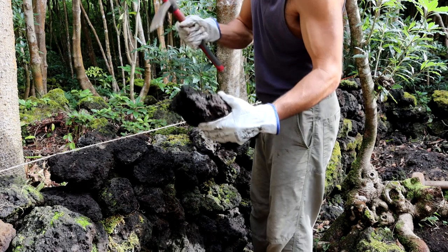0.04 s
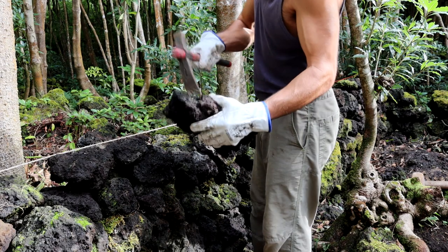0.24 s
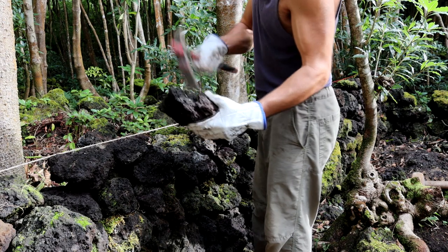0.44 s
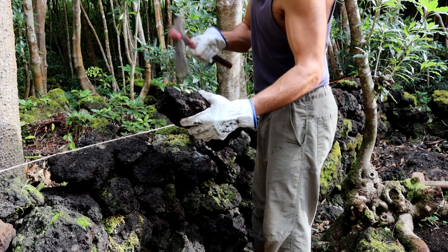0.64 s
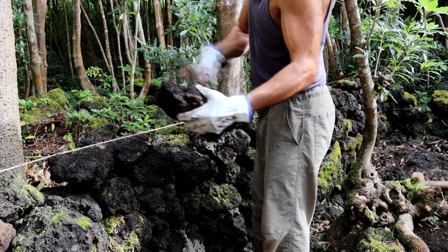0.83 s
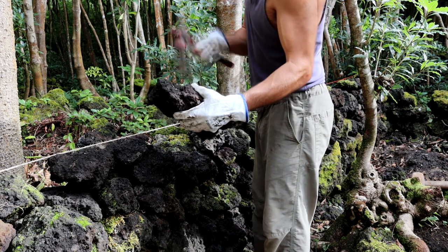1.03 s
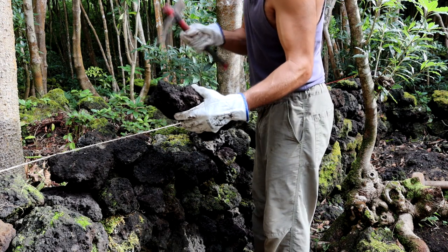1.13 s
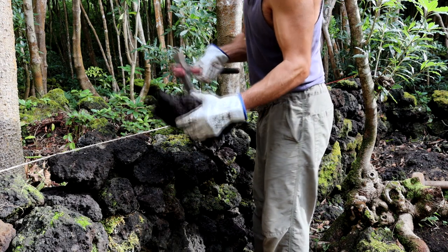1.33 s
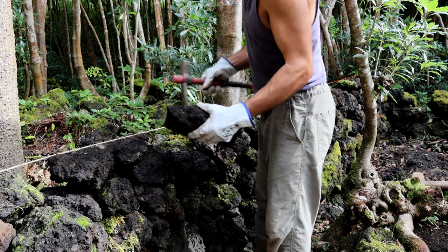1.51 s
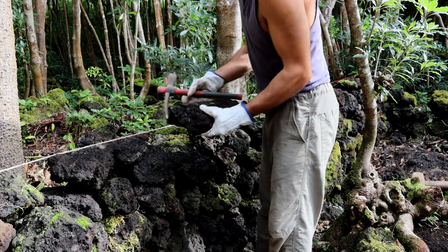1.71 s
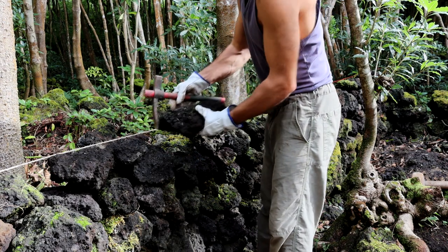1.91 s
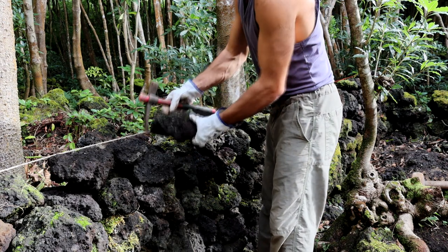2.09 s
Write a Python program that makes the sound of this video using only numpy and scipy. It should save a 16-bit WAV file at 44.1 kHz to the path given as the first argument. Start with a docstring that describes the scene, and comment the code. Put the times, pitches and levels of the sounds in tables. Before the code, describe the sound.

A steel hammer chips a hand-held rock close by, striking at about 0.2, 0.5, 0.9 and 1.3 seconds, with a lighter tap at 1.0. Each blow crunches, knocks and rings briefly, and small chips click between them. From 1.8 seconds the head touches the rock and scrapes grittily. Behind are a low woodland hush, soft clothing rustle and a faint high bird whistle from 0.7 to 1.7 seconds.

```python
"""Hammer chipping rock in a wood

A steel hammer chips a porous rock held in a gloved hand: each blow crushes grit, knocks the rock and
rings the hammer head. Chips click and fall; then the head is laid on the rock and scrapes over it.
Behind are a low outdoor hush, clothing rustle, tiny ticks and a faint high whistle, probably a bird."""
import sys
import numpy as np
from scipy import signal
from scipy.fft import rfft, irfft, next_fast_len
from scipy.io import wavfile
from scipy.ndimage import map_coordinates

SR = 44100
rng = np.random.default_rng(int(sys.argv[2]) if len(sys.argv) > 2 else 0)


def to_wav(sig):
    """Store sig (one row per channel, or 1-D mono) as 16-bit WAV at the path in sys.argv[1].

    Samples outside -1..1 are clipped; the rate is SR.
    """
    pcm = np.clip(np.atleast_2d(sig), -1, 1) * 32767
    pcm = np.round(pcm).astype(np.int16)
    wavfile.write(sys.argv[1], SR, pcm.T)  # frames by channels


N = 94815


def amp(db):
    """Decibels to gain."""
    return 10 ** (np.asarray(db) / 20)


def unit(x):
    """Scale to rms 1."""
    return x / np.sqrt(np.mean(x ** 2) + 1e-20)


def along(points, hz):
    """Read a curve of (f/Hz, value) points on a log frequency axis."""
    freqs, values = np.transpose(points)
    return np.interp(np.log(hz + 1), np.log(freqs + 1), values)


def curves(rows):
    """Automation: one value per sample for each column after the time."""
    times, *columns = np.transpose(rows)
    return [np.interp(np.arange(N) / SR, times, column) for column in columns]


def wobble(rate):
    """A smooth random curve with `rate` knots a second."""
    return map_coordinates(rng.standard_normal(N // 10), [np.arange(N) * rate / SR], mode="wrap")


def filtered(x, response):
    """Apply a gain given as a function of frequency in Hz."""
    n = x.shape[-1]
    padded = next_fast_len(n + SR // 10)
    return irfft(rfft(x, padded) * response(np.fft.rfftfreq(padded, 1 / SR)), padded)[..., :n]


def add(out, start, sound):
    """Mix a sound in at `start` seconds."""
    part = out[:, round(start * SR):][:, :sound.shape[-1]]
    part += sound[..., :part.shape[-1]]


def envelope(t, rise, hold, t60):
    """Attack, hold, then exponential decay; times in seconds."""
    return (1 - np.exp(-t / rise)) * amp(-60 * np.maximum(t - hold, 0) / t60)


def burst(t, colour_db, side_db):
    """Coloured noise of rms 1 with a narrow stereo image."""
    mid, side = filtered(rng.standard_normal((2, len(t))), lambda hz: amp(colour_db(hz)))
    return unit(np.array([mid + amp(side_db) * side, mid - amp(side_db) * side]))


def ring(t, modes, rise, scatter_db):
    """Damped modes, struck a little differently each time and roughened by grit in the contact."""
    draws = rng.standard_normal((len(modes), 3))  # left level, right level, phase
    walks = np.cumsum(rng.standard_normal((len(modes), len(t))), axis=1)
    drifts = 0.35 * walks / np.sqrt(SR * 0.01)  # phase wanders about 0.35 rad in 10 ms
    out = np.zeros((2, len(t)))
    for (hz, db, t60), draw, drift in zip(modes, draws, drifts):
        gain = amp(db + scatter_db * draw[:2, None])
        out += gain * np.sin(2 * np.pi * (hz * t + draw[2]) + drift) * envelope(t, rise, 0, t60)
    return out


def grains(per_s, spread_db):
    """Random impulses; a positive spread makes a few louder, a negative one a few softer."""
    impulses = (rng.random(N) < per_s / SR) * rng.choice([-1, 1], N)
    return impulses * amp(spread_db * np.minimum(rng.exponential(size=N), 2 * np.pi))


def hush():
    """Outdoor bed: a centred low murmur that swells with clothing rustle, and a wide leaf hiss."""
    # murmur spectrum: f/Hz, level/dB
    murmur_colour = [(20, -28), (45, -21), (70, -9.5), (88, -3), (115, -7), (200, -5.5), (330, 0),
                     (520, -3), (750, -7), (1500, -16.5), (3000, -27), (16000, -37)]
    # stereo likeness of the murmur: f/Hz, left-right correlation
    likeness = [(100, 0.93), (350, 0.94), (900, 0.43), (2000, 0.05), (12000, 0.3)]
    # swells of low clothing rustle as the worker moves, over the outdoor hush: t/s, level/dB
    rustle = [(0, -52), (.5, -49.5), (.75, -50.5), (1.0, -53), (1.17, -49), (1.42, -52), (1.57, -47),
              (1.68, -52), (1.81, -46), (2.0, -50.5), (2.12, -48)]
    # leaf spectrum: f/Hz, level/dB
    leaf_colour = [(300, -22), (1500, 2.5), (3000, -1.5), (4300, 4.5), (5500, 1), (7000, 0.5),
                   (10000, -5.5), (16000, -5)]

    def mid_side_gains(hz):
        angle = np.arccos(np.clip(along(likeness, hz), -1, 1)) / 2
        return amp(along(murmur_colour, hz)) * [np.cos(angle), np.sin(angle)]

    mid, side = filtered(rng.standard_normal((2, N)), mid_side_gains)
    murmur = unit(np.array([mid + side, mid - side]))
    leaves = unit(filtered(rng.standard_normal((2, N)), lambda hz: amp(along(leaf_colour, hz))))
    murmur_db, = curves(rustle)
    return amp(murmur_db) * murmur + amp(-54) * leaves


def wood(x):
    """Woodland reverb: quick scatter from ground and wall, then a thin tail from the trees."""
    # decay of the tail: f/Hz, t60/s
    decay = [(150, 0.14), (600, 0.34), (2000, 0.38), (4500, 0.33), (9000, 0.38), (15000, 0.59)]
    # spectrum of the tail: f/Hz, level/dB
    colour = [(200, -17), (1000, 2.5), (3200, 0), (4300, 9), (5400, -0.5), (7500, 1), (14000, -12.5)]
    band_hz, frame_s, bands = signal.stft(rng.standard_normal((2, SR // 2)), SR, nperseg=256)
    fade = amp(-60 * frame_s / along(decay, band_hz)[:, None])
    _, tail = signal.istft(bands * fade, SR, nperseg=256)
    tail = filtered(tail, lambda hz: amp(along(colour, hz)))
    t = np.arange(tail.shape[1]) / SR
    early = rng.standard_normal(tail.shape) * envelope(t, rise=0.008, hold=0.01, t60=0.076)
    response = amp(-19.5) * tail / np.linalg.norm(tail[0]) + amp(-17) * early / np.linalg.norm(early[0])
    return signal.fftconvolve(x, response, axes=1)[:, :N]


def whistle():
    """A faint gliding tone that arrives by many paths, so it flutters and blurs."""
    # whistled phrase: t/s, f/Hz, level/dB
    phrase = [(.69, 6200, -58), (.73, 5900, -52), (.79, 7000, -51), (.85, 6900, -56), (.95, 6500, -68),
              (1.06, 6300, -54), (1.16, 6170, -51), (1.235, 6480, -50), (1.32, 5950, -50),
              (1.42, 6700, -59), (1.52, 7450, -55), (1.585, 6900, -48), (1.60, 6300, -51),
              (1.64, 5950, -54), (1.68, 5700, -72)]
    hz, db = curves(phrase)
    t = np.arange(N) / SR
    phase = 2 * np.pi * np.cumsum(hz * (1 + 0.007 * wobble(500))) / SR
    gate = (t > phrase[0][0]) * (t < phrase[-1][0])
    tone = amp(db + 2 * wobble(25)) * np.sin(phase) * gate
    paths = rng.standard_normal((2, SR // 10)) * envelope(t[:SR // 10], rise=0.001, hold=0, t60=0.015)
    return signal.fftconvolve(tone[None], paths / np.linalg.norm(paths[0]), axes=1)[:, :N]


def ticks():
    """Tiny sparse ticks of falling grit."""
    # tick spectrum: f/Hz, level/dB
    colour = [(500, -20), (3000, -2), (6000, 0), (12000, -2), (16000, -7)]
    clicks = filtered(grains(per_s=40, spread_db=1.5), lambda hz: amp(along(colour, hz)))
    t = np.arange(SR // 50) / SR
    body = rng.standard_normal((2, len(t))) * envelope(t, rise=0.0001, hold=0, t60=0.008)
    return amp(-61) * unit(signal.fftconvolve(clicks[None], body, axes=1)[:, :N])


def scrape():
    """Steel and glove rub over the rock in dense gritty slips."""
    # swell of the strokes: t/s, level/dB
    strokes = [(0, -41.5), (.04, -58), (.7, -51), (1.15, -52.5), (1.45, -53.5), (1.56, -49), (1.615, -42),
               (1.67, -49.5), (1.70, -73), (1.825, -54.5), (1.865, -35), (1.935, -37), (1.952, -39),
               (1.972, -33), (2.015, -49.5), (2.08, -46.5), (2.105, -47.5), (2.15, -39)]
    # grit spectrum: f/Hz, level/dB
    colour = [(100, -20), (250, -8), (600, -4.5), (1400, 3), (2700, 1.5), (5000, -1.5), (8000, -4),
              (12400, -8.5), (16000, -8)]
    level_db, = curves(strokes)
    slips = np.array([unit(grains(per_s=4200, spread_db=-0.5)) for _ in range(3)])  # centre, left, right
    stereo = slips[0] + amp(-7) * slips[1:]
    return amp(level_db) * unit(filtered(stereo, lambda hz: amp(along(colour, hz))))


def chips():
    """Fragments and light touches: each a short click with one resonant peak."""
    # clicks: t/s, level/dB, centre f/Hz, width/octaves, t60/s
    clicks = [(0.306, -38, 13000, 0.63, .015), (0.3747, -42.5, 7200, 2, 0.09),
              (0.4046, -37, 7000, 1.5, .015), (0.4407, -40, 2510, 6, 0.019), (.4638, -42, 7200, 1.2, .015),
              (0.569, -8, 1840, 0.7, 0.017), (0.575, -27.5, 2190, 1.1, 0.067),
              (0.9276, -29.5, 2370, 0.93, 0.038), (0.9344, -31.5, 9200, 2.3, 0.029),
              (0.9363, -33.5, 296, 0.55, 0.031), (1.0358, -45, 12000, 1, .015),
              (1.1149, -35.5, 10200, 1.3, 0.016), (1.1532, -36.5, 3300, 1.8, 0.037),
              (1.3815, -32.5, 880, 1.4, 0.032), (1.3934, -22.5, 6030, 0.17, 0.0089),
              (1.3931, -25, 2250, .5, .018), (1.582, -35.5, 3000, 1.6, 0.022),
              (1.8352, -35, 2310, 3, 0.055), (1.851, -31, 1670, 1.1, 0.023),
              (1.8614, -26, 1300, 3.8, 0.021), (1.9644, -25.5, 4160, 4.4, 0.041),
              (1.9735, -28, 4540, 4.5, 0.027), (2.0487, -33.5, 2780, 2.3, 0.029)]
    out, t = np.zeros((2, N)), np.arange(SR // 6) / SR
    for start, db, centre_hz, width, t60 in clicks:
        def peak_db(hz):
            octaves = np.abs(np.log2((hz + 1) / centre_hz))
            return -10 * np.log10(1 + (2 * octaves / width) ** 2) - 2.2 * octaves

        click = burst(t, peak_db, side_db=-12) * envelope(t, rise=0.000093, hold=0.00043, t60=t60)
        add(out, start, amp(db) * click)
    return out


def knocks():
    """The rock recoils in the glove with a thump, a hollow two-tone knock, a clack and a clink."""
    # recoils, varying with the grip and the spot struck: t/s, thump/dB, knock f/Hz, knock/dB,
    # second tone f/Hz, second tone/dB, clack f/Hz, clack/dB, clack t60/s, clink f/Hz, clink/dB
    recoils = [(.2255, -25, 553, -10.5, 791, -15.5, 1190, -5, 0.022, 3010, -17.5),
               (.5335, -36, 383, -22, 712, -20, 1487, -7, 0.04, 1154, -18),
               (.8696, -27, 581, -16, 379, -20.5, 1572, -21, 0.043, 2756, -15.5),
               (1.002, -42.5, 543, -25.5, 620, -39, 2026, -23, 0.052, 3020, -20.5),
               (1.3357, -21.5, 611, -13.5, 292, -20, 1220, -5.5, 0.014, 1518, -16.5)]
    # thump spectrum: f/Hz, level/dB
    thump_colour = [(25, -54), (70, -9.5), (160, -4), (330, 2), (480, -10.5), (1000, -43)]
    out, t = np.zeros((2, N)), np.arange(SR // 5) / SR

    def tone(hz, db, rise, hold, t60):
        return amp(db) * np.sin(2 * np.pi * hz * t) * envelope(t, rise, hold, t60)

    for (start, thump_db, knock_hz, knock_db, second_hz, second_db,
         clack_hz, clack_db, clack_t60, clink_hz, clink_db) in recoils:
        thump = burst(t, lambda hz: along(thump_colour, hz), side_db=-30)
        thump *= amp(thump_db) * envelope(t, rise=0.0011, hold=0.0043, t60=0.033)
        knock = tone(knock_hz, knock_db, rise=0.0028, hold=0.0063, t60=0.017)
        knock += tone(second_hz, second_db, rise=0.0028, hold=0.0055, t60=0.029)
        clack = tone(clack_hz, clack_db, rise=0.002, hold=0.00078, t60=clack_t60)
        clink = tone(clink_hz, clink_db, rise=0.0016, hold=0.0028, t60=0.024)
        add(out, start, thump + knock + clack + clink)
    return out


def hammer():
    """Each blow crushes the surface for a few milliseconds; the rock rings briefly, the steel longer."""
    # blows: t/s, crunch/dB, crush length/s, crunch t60/s, crunch and rock tilt/(dB per octave),
    # rock/dB, head/dB, head tilt/(dB per octave), head decay factor
    blows = [(0.224, -9.5, 0.0036, 0.0066, 0, -14, -18.5, 7, 0.72),
             (0.5329, -15.5, 0.011, 0.045, 1.16, -20, -18.5, 9, 0.6),
             (0.5408, -35, 0.0019, 0.016, 0.5, -31, -15, -3.5, 0.72),
             (0.8684, -14.5, 0.0049, 0.025, 1, -18, -20, 4, 0.95),
             (1.001, -22, 0.0052, 0.053, 1.5, -26, -44, 11, 1),
             (1.0217, -35, 0.0055, 0.054, 1, -34.5, -26.5, -4, 0.81),
             (1.3349, -14, 0.0046, 0.0071, -1.1, -17, -33.5, -6, 1.1),
             (1.8596, -27, 0.0032, 0.039, -1.5, -37, -29.5, -5, 0.91)]
    # spectrum of crushed grit: f/Hz, level/dB
    crunch_colour = [(60, -63), (250, -11), (600, 7), (1200, -3.5), (2500, -1.5), (4200, -2), (6000, -4.5),
                     (9000, -5.5), (12500, -4.5), (16000, -10.5)]
    # rock modes: f/Hz, level/dB
    rock_modes = [(1020, -1), (1490, -2), (2030, 2.5), (2450, -13), (2850, -6), (3050, 6), (3350, 4),
                  (3880, -11), (4130, 4.5), (4420, 3.5), (5050, 2.5), (6600, -3), (7590, 6)]
    # steel head modes: f/Hz, level/dB, base t60/s
    head_modes = [(3945, -12, .13), (4262, -4, .11), (7595, -13, .13), (9150, 0, .13), (11725, -4, .19),
                  (11930, -11, .06), (12622, -11, .07)]
    rock_t60 = 0.023
    out, t = np.zeros((2, N)), np.arange(SR // 3) / SR
    for start, crunch_db, crush_s, crunch_t60, tilt, rock_db, head_db, head_tilt, head_decay in blows:
        def tilt_db(hz):
            return tilt * np.log2(np.maximum(hz, 500) / 3000)

        crunch = burst(t, lambda hz: along(crunch_colour, hz) + tilt_db(hz), side_db=-13)
        crunch *= amp(crunch_db) * envelope(t, rise=0.00089, hold=crush_s, t60=crunch_t60)
        rock = [(hz, db + tilt_db(hz), rock_t60) for hz, db in rock_modes]
        head = [(hz, db + head_tilt * np.log2(hz / 8000), t60 * head_decay) for hz, db, t60 in head_modes]
        rock_ring = amp(rock_db) * ring(t, rock, rise=0.0013, scatter_db=1.5)
        head_ring = amp(head_db) * ring(t, head, rise=0.0017, scatter_db=1)
        add(out, start, crunch + rock_ring + head_ring)
    return out


def scene():
    """The work sits a little left of centre, with the wood all round."""
    work = hammer() + chips() + scrape()
    recoil = knocks()
    lead_s = np.array([[1.3e-5], [-1.3e-5]])  # left arrives early, right late
    direct = filtered(work + recoil, lambda hz: np.exp(2j * np.pi * hz * lead_s))
    reverb = wood(work + amp(-3) * recoil)
    return direct + reverb + ticks() + whistle() + hush()


def record(dry):
    """Hard-limit peaks at full scale, then cut everything above 16 kHz."""
    return filtered(np.clip(dry, -1, 1), lambda hz: hz < 16000)


dry = scene()
out = record(dry)
to_wav(out)
```